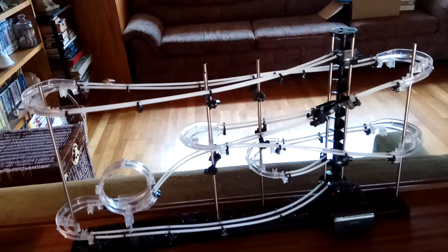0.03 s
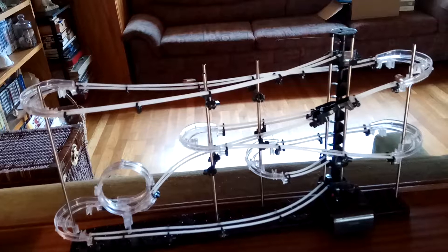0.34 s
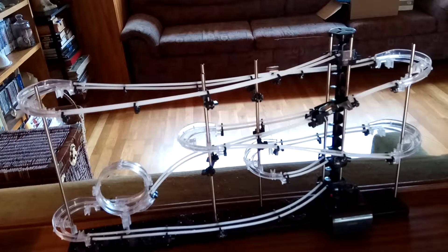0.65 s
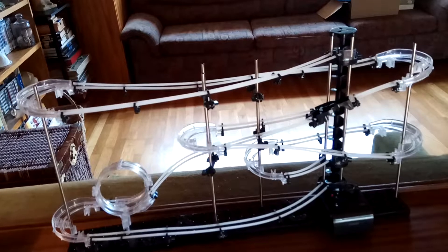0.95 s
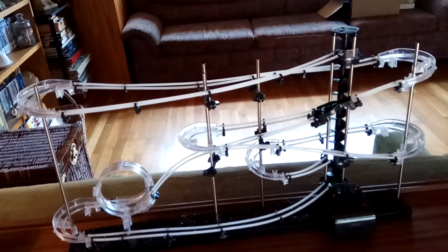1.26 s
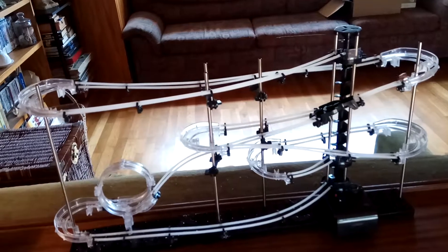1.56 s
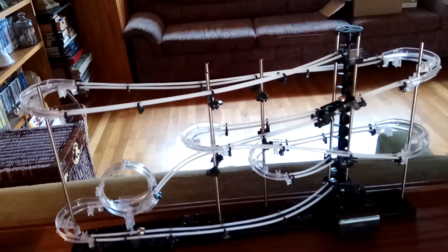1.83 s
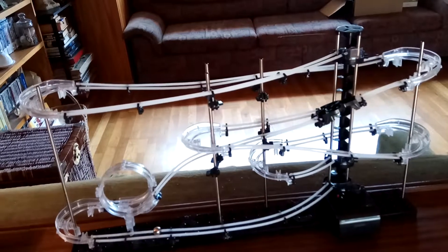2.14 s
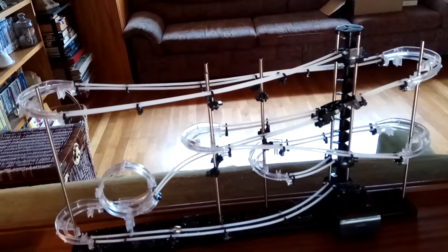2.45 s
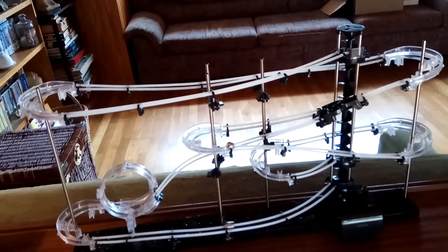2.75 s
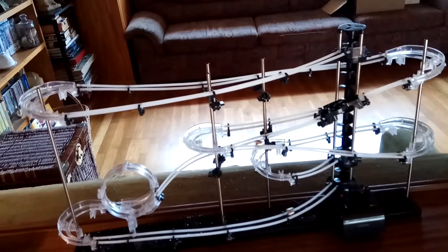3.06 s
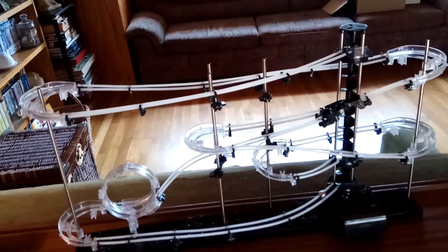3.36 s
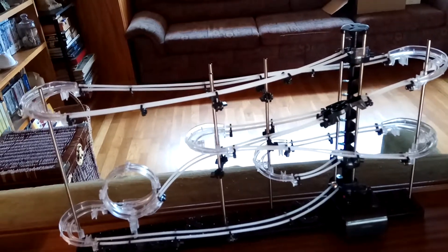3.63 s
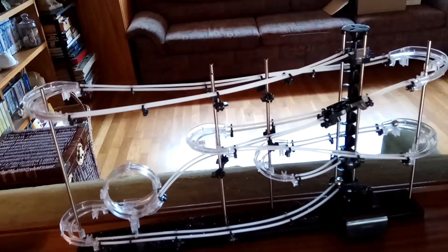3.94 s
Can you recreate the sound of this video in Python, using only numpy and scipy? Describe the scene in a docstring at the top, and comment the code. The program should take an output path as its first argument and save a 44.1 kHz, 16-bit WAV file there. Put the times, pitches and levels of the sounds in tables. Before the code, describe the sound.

Whirring marble run motor, with metal balls rolling, clicking and knocking on the plastic track.

```python
"""A living room with a motorised marble run. The geared lift whirs and sags in pitch each time it
takes up a load. Steel balls click against each other, knock into the track and rumble along plastic
rails; in the bends they make the frame boom softly. Two close microphones feed a fast limiter,
and the sound fades in at the start."""
import sys
import numpy as np
from scipy import signal
from scipy.fft import rfft, irfft, next_fast_len
from scipy.io import wavfile
from scipy.ndimage import uniform_filter1d, minimum_filter1d, map_coordinates

SR = 44100
rng = np.random.default_rng(int(sys.argv[2]) if len(sys.argv) > 2 else 0)


def dump(signal):
    """Clip the signal to [-1, 1] and save it as 16-bit WAV at the path in sys.argv[1]."""
    limited = np.clip(np.atleast_2d(signal).T, -1, 1)
    pcm = np.round(limited * 32767).astype(np.int16)
    wavfile.write(sys.argv[1], SR, pcm)


N = 176400

# time_from_load_s, tooth_rate_hz, whine_db, rattle_db
LIFT_CYCLE = [(-.19, 1022, -1, -2), (-.125, 1034, -1, -1.5), (-.06, 1038, -9.5, -1), (-.022, 1040, -1, -2),
              (.006, 1011, 8.5, 0), (.024, 985, 2, 1), (.05, 944, 2, -1.5), (0.083, 896, 0.5, 1),
              (.105, 899, -6, -1), (0.159, 983, -9.5, -4)]
# One row per cycle: free_whine_db, loaded_whine_db
WHINE_SWELLS = [(-1.5, 0.5), (-1.5, -1), (1.5, 1.5), (-2.5, -3), (-2.5, 0.5), (-2, 1), (-4.5, 0), (-1.5, 0),
                (-3, -0.5)]
# teeth_per_turn, whine_swing_db, rattle_swing_db
OFF_CENTRE_GEARS = [(12.07, 2, 0.34), (29.63, 2, 1)]
# tooth_rate_multiple, level_db
GEAR_HARMONICS = [(1, -37), (2, -34), (3, -56), (4, -57.5)]
# freq_hz, gain_db
GEARBOX_SHELL = [(700, -10), (900, 6.5), (970, -11.5), (1040, -6), (1200, -6.5), (1750, -6), (1930, -2.5),
                 (2025, 2), (2090, 1), (2400, -14.5), (4100, 16.5), (6000, -20)]
# freq_hz, gain_db
TOOTH_RATTLE_BODY = [(60, -33.5), (400, -45.5), (520, -20), (760, -17.5), (890, -8.5), (1050, -15.5),
                     (1220, -14.5), (1420, -9.5), (1570, -2.5), (1720, -10.5), (1920, -5), (2040, -0.5),
                     (2100, 3.5), (2190, -6), (2330, -11), (2700, -12), (3500, -11), (4150, -7.5),
                     (4750, -18), (7200, -21.5), (8700, -40.5), (10200, -38.5), (13700, -49.5),
                     (14800, -30.5), (16000, -53)]

def lift(first_load_s=.531, cycle_s=.4075, runout=.008, slip_teeth=.099, load_roughening=11.4):
    """Loose plastic gears whine and tick once a tooth; slower, louder and rougher under load."""
    t = np.arange(N) / SR
    cycle_times, *columns = np.transpose(LIFT_CYCLE)
    tooth_hz, whine_db, rattle_db = [
        np.interp(t - first_load_s, cycle_times, column, period=cycle_s) for column in columns]
    swells_db = np.ravel(WHINE_SWELLS)
    swell_times = first_load_s + (np.arange(len(swells_db)) - 1) * cycle_s / 2
    whine_db += np.interp(t, swell_times, swells_db)
    teeth = np.cumsum(tooth_hz * (1 + runout * wobble(70))) / SR
    for teeth_per_turn, whine_swing_db, rattle_swing_db in OFF_CENTRE_GEARS:
        binding = np.sin(2 * np.pi * (teeth / teeth_per_turn + 0.26 * wobble(8)))  # once a turn
        whine_db += whine_swing_db * binding
        rattle_db += rattle_swing_db * binding
    sag = 1 - tooth_hz / tooth_hz.max()
    slipped = teeth + slip_teeth * (1 + load_roughening * sag) * wobble(170) / 2
    tones = sum(amp(db + 0.38 * wobble(90)) * np.sqrt(2) * np.sin(2 * np.pi * multiple * slipped)
                for multiple, db in GEAR_HARMONICS)
    whine = body(tones * amp(whine_db + 0.5), GEARBOX_SHELL)
    ticks = np.exp(-(teeth % 1) / 0.2) * rng.standard_normal(N)
    ticks *= np.exp(0.235 * wobble(600))  # uneven teeth
    rattle = unit_rms(body(ticks * amp(0.43 * wobble(70)), TOOTH_RATTLE_BODY))
    rattle *= amp(rattle_db - 30 + 0.24 * wobble(6.92))
    return in_room(whine, wet_db=-2.5, early_db=-2.5) + in_room(rattle, wet_db=-6.5, early_db=-0.5)


# start_s, level_db, pitch_hz, snap_db
BALL_CLICKS = [(.44, -22, 6758, -0.5), (.657, -22, 6013, -3), (0.6775, -0.5, 6010, -2),
               (.833, -15, 5280, -12), (1.2135, -16, 6500, -3), (1.498, -20.5, 7410, -5),
               (1.538, -31, 7530, 6), (1.5578, -16, 7322, 7.5), (1.69, -17, 6140, -2),
               (1.7, -13.5, 3830, -4), (1.858, -26, 6395, 2), (1.8862, -5, 7175, 3.5),
               (1.936, -24, 7057, -6), (1.996, -14, 5350, -8), (2.008, -18, 5320, 3.5),
               (2.058, -13, 5370, -3), (2.081, -16, 6200, -15), (2.182, -18, 5270, -5),
               (2.366, -24.5, 5800, -2), (2.535, -28, 6920, 0), (3.677, -11, 5498, -0.5),
               (3.876, -22, 5678, 7.5)]
# freq_hz, gain_db
CLICK_BODY = [(150, -66), (500, -45), (2500, -25), (3700, -7.5), (4700, -0.5), (5260, 1), (6500, -2.5),
              (7700, -.5), (8800, -24.5), (11100, -16), (13500, -22), (15100, -15), (16500, -25)]

def ball_clicks(ring_t60_s=.006, snap_s=.0025, shake_s=.007, wall_echo_s=.0212, wall_echo_db=-12):
    """Steel on steel: a snap, a short ring pitched by the spot struck, and a rattle of the rails."""
    t = np.arange(SR // 16) / SR
    strike, shake = np.zeros((2, N + SR))
    for start_s, level_db, pitch_hz, snap_db in BALL_CLICKS:
        start = round(start_s * SR)
        ring = amp(3 - 60 * t / ring_t60_s) * np.sin(2 * np.pi * pitch_hz * t)
        snap = amp(snap_db - 1) * np.exp(-(t / snap_s) ** 2) * rng.choice([-1, 1], len(t))
        strike[start:][:len(t)] += amp(level_db) * (ring + snap)
        shake[start:][:len(t)] += amp(level_db - 8.5) * np.exp(-t / shake_s) * rng.standard_normal(len(t))
    rail_band = signal.butter(2, (4400, 7630), "band", fs=SR, output="sos")
    rails = signal.sosfilt(rail_band, shake[:N])
    rails = filtered(rails, lambda hz: 1 + amp(wall_echo_db) * np.exp(-2j * np.pi * hz * wall_echo_s))
    steel = body(strike[:N], CLICK_BODY)
    return in_room(steel, wet_db=-7, early_db=-9) + in_room(rails, wet_db=4, early_db=-3)


# start_s, level_db
TRACK_KNOCKS = [(1.216, -13), (1.222, -17.5), (1.44, -19.5), (1.461, -23.5), (1.505, -17), (2.366, -27),
                (2.385, -20), (3.679, -14.5), (3.877, -16)]
# freq_hz, gain_db
TRACK_BODY = [(60, -30), (140, -35), (400, -16), (650, -4), (850, 4.5), (1300, 6), (2200, -9.5),
              (4000, -2.5), (8000, -22), (15000, -56)]

def track_knocks(contact_s=0.003, shake_db=-16.5, shake_s=0.011):
    """A ball hits the track: a short crack, then loose parts shake, all rung through one body."""
    t = np.arange(SR // 8) / SR
    crack = t / contact_s * np.exp((1 - (t / contact_s) ** 2) / 2)
    envelope = crack + amp(shake_db) * np.exp(-t / shake_s)
    force = np.zeros(N + SR)
    for start_s, level_db in TRACK_KNOCKS:
        force[round(start_s * SR):][:len(t)] += amp(level_db) * rng.standard_normal(len(t)) * envelope
    return amp(2) * in_room(body(force[:N], TRACK_BODY), wet_db=-3.5, early_db=-5)


# time_s, level_db
RUMBLE_ENVELOPE = [(0.15, -58), (0.3, -51), (0.42, -66), (0.46, -52), (0.63, -70), (0.71, -55.5),
                   (0.78, -59), (0.87, -54.5), (1.06, -70), (1.2, -66.5), (1.22, -56), (1.24, -46),
                   (1.39, -61), (1.48, -51), (1.5, -54), (1.63, -46.5), (1.84, -57), (1.95, -46.5),
                   (1.99, -56), (2.03, -50.5), (2.1, -58), (2.24, -51), (2.34, -66), (2.38, -53),
                   (2.48, -58.5), (2.53, -58), (2.58, -64.5), (2.88, -54), (2.96, -70.5), (3.66, -71.5),
                   (3.72, -49.5), (3.76, -54), (3.82, -47.5), (4.0, -55.5)]
# freq_hz, gain_db
FRAME_BODY = [(25, -33), (60, -16.5), (105, -11), (128, -1.5), (144, 4), (158, -13), (175, -4.5), (215, -7),
              (255, -1.5), (320, -7.5), (420, -12), (700, -12), (2000, -94)]
# time_s, level_db
CHATTER_ENVELOPE = [(0.15, -54), (0.38, -51.5), (1.19, -54.5), (1.22, -41), (1.26, -42), (1.4, -52),
                    (1.44, -41.5), (1.73, -45.5), (1.75, -49), (2.26, -49.5), (2.29, -69), (2.39, -43.5),
                    (2.78, -58), (2.81, -57.5), (3.12, -64), (3.66, -54), (3.69, -40.5), (3.74, -51),
                    (3.86, -47.5), (3.88, -38), (3.97, -66), (4.0, -69.5)]
# freq_hz, gain_db
RAIL_BODY = [(150, -33.5), (380, -18), (650, 1), (1050, 5), (1300, -1), (1600, -3), (2600, -1.5),
             (4200, -13.5), (7200, -9.5), (9000, -33), (15000, -29)]

def rolling_balls(rumble_gain_db=1, chatter_gain_db=9.5):
    """Balls bump over the rails' roughness: the frame rumbles and the rails chatter."""
    rumble = unit_rms(body(contacts(rate_hz=720, spread=0.53), FRAME_BODY))
    rumble *= amp(over_time(RUMBLE_ENVELOPE) + rumble_gain_db)
    chatter = unit_rms(body(contacts(rate_hz=1000, spread=0.41), RAIL_BODY))
    chatter *= amp(over_time(CHATTER_ENVELOPE) + chatter_gain_db)
    return in_room(rumble, wet_db=-3.5, early_db=-10) + in_room(chatter, wet_db=-14.5, early_db=-5)


# start_s, level_db
FRAME_BOOMS = [(.435, -35.5), (0.679, -38.5), (.82, -39), (1.631, -39), (2.49, -38)]

def frame_booms(mode_hz=135.4, rise_s=0.026, t60_s=0.21):
    """Balls swinging through bends excite the frame's lowest mode, which swells and dies away."""
    t = np.arange(SR // 2) / SR
    rise = 1 - np.exp(-(t / rise_s) ** 2)
    booms = np.zeros(N + SR)
    for start_s, level_db in FRAME_BOOMS:
        pitch_hz = mode_hz * (1 + 0.021 * rng.standard_normal())
        envelope = amp(level_db - 60 * t / t60_s) * rise
        booms[round(start_s * SR):][:len(t)] += envelope * np.sin(2 * np.pi * pitch_hz * t)
    return booms[:N]


# freq_hz, t60_s
ROOM_DECAY = [(150, 0.062), (1000, 0.44), (6000, 0.44), (15000, 0.38)]

def in_room(x, wet_db, early_db, early_s=0.0054, tail_rise_s=0.0081, left_lead_s=0.0001):
    """Direct sound from left of centre, near reflections and the room's tail."""
    freq_hz, frame_s, noise = signal.stft(rng.standard_normal((2, SR // 2)), SR, nperseg=256)
    decay = amp(-60 * frame_s / over_freq(ROOM_DECAY, freq_hz)[:, None])
    tail = signal.istft(noise * decay, SR, nperseg=256)[1]
    t = np.arange(tail.shape[1]) / SR
    tail *= 1 - np.exp(-t / tail_rise_s)
    early = rng.standard_normal(tail.shape) * np.exp(-t / early_s)
    response = amp(wet_db) * tail / np.linalg.norm(tail[0])
    response += amp(early_db) * early / np.linalg.norm(early[0])
    reflected = signal.fftconvolve(x[None], response, axes=1)[:, :N]
    direct = filtered(x, lambda hz: np.exp(1j * np.pi * hz * left_lead_s * np.array([[1], [-1]])))
    return (direct + reflected) / np.sqrt(1 + amp(wet_db) ** 2 + amp(early_db) ** 2)


def body(x, colour, size=8192):
    """Ring x through a minimum-phase body given as (freq_hz, gain_db) points."""
    gain = amp(over_freq(colour, np.fft.rfftfreq(size, 1 / SR)))
    cepstrum = irfft(np.log(gain))
    cepstrum[1:size // 2] *= 2
    cepstrum[size // 2 + 1:] = 0
    return signal.fftconvolve(x, irfft(np.exp(rfft(cepstrum))))[:N]


def contacts(rate_hz, spread):
    """Random tiny impacts of log-normal size."""
    hits = rng.random(N) < rate_hz / SR
    return hits * rng.choice([-1, 1], N) * np.exp(spread * rng.standard_normal(N))


def wobble(rate_hz):
    """Smooth random curve with knots at rate_hz."""
    return map_coordinates(rng.standard_normal(8192), [np.arange(N) * rate_hz / SR], mode="wrap")


def filtered(x, response):
    """Apply a complex frequency response."""
    size = next_fast_len(N + SR // 2)
    return irfft(rfft(x, size) * response(np.fft.rfftfreq(size, 1 / SR)), size)[..., :N]


def over_freq(points, hz):
    """Interpolate (freq_hz, value) points on a log axis."""
    freq_hz, values = np.transpose(points)
    return np.interp(np.log(hz + 1), np.log(freq_hz + 1), values)


def over_time(points):
    """Interpolate (time_s, value) points at every sample."""
    return np.interp(np.arange(N) / SR, *np.transpose(points))


def amp(db):
    """Decibels to gain."""
    return 10 ** (np.asarray(db) / 20)


def unit_rms(x):
    """Scale to rms 1."""
    return x / np.sqrt(np.mean(x ** 2) + 1e-20)


def scene():
    """The lift and the balls on their track, in stereo."""
    return track_knocks() + lift() + rolling_balls() + frame_booms() + ball_clicks()


# freq_hz, left_minus_right_db
MIC_IMBALANCE = [(150, -1.5), (900, 2.2), (2000, 3), (2700, -1.5), (3400, -9), (4200, -5), (5500, -2.5),
                 (7500, -6), (9500, 6.5), (12000, 17.5), (15000, 19.5)]
# time_s, gain_db
OPENING_FADE = [(.085, -82), (.098, -18.5), (.2, -7.5), (.35, -2), (.5, 0)]

def record(dry, limit_db=-3.5, look_ahead_s=0.012, release_db_per_s=226, top_hz=16000):
    """Two unequal microphones, fade-in, look-ahead limiter and band limit."""
    x = filtered(dry, lambda hz: amp(over_freq(MIC_IMBALANCE, hz) * np.array([[.5], [-.5]])))
    x *= amp(over_time(OPENING_FADE))
    peak_db = 20 * np.log10(np.abs(x).max(0) + 1e-9)
    over_db = np.maximum(peak_db - limit_db, 0)
    look_samples = int(look_ahead_s * SR)
    held_db = -minimum_filter1d(-over_db, 2 * look_samples + 1)
    release_db = release_db_per_s * np.arange(N) / SR
    cut_db = np.maximum.accumulate(held_db + release_db) - release_db
    limited = x * amp(-uniform_filter1d(cut_db, look_samples))
    return filtered(limited, lambda hz: hz < top_hz)


dry = scene()
out = record(dry)
dump(out)
```